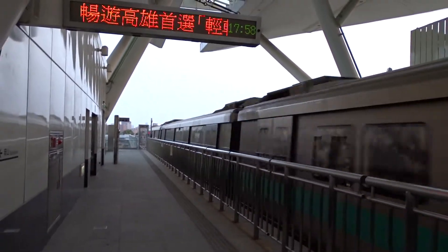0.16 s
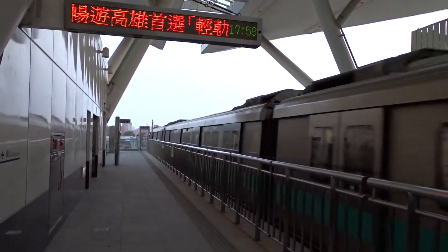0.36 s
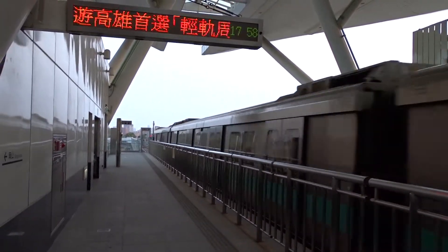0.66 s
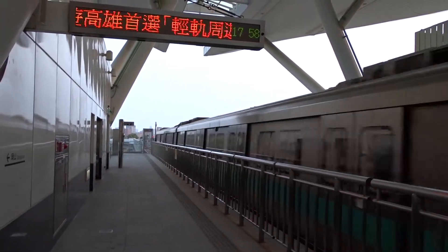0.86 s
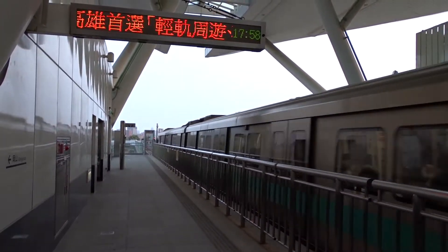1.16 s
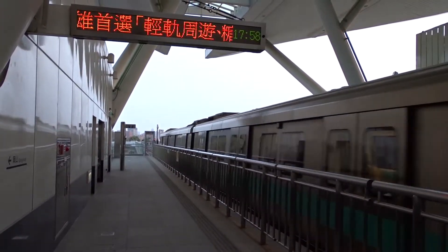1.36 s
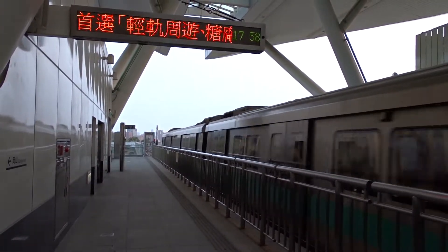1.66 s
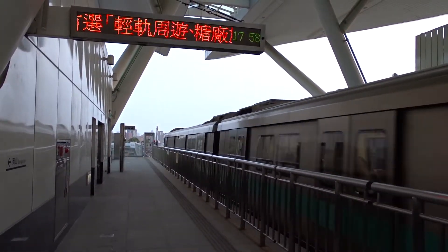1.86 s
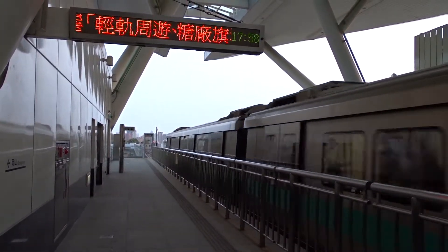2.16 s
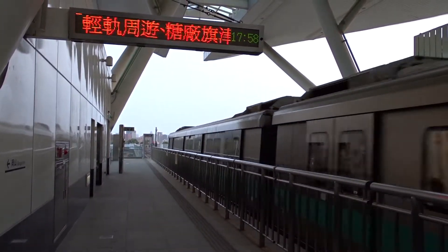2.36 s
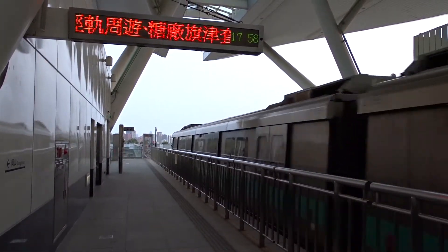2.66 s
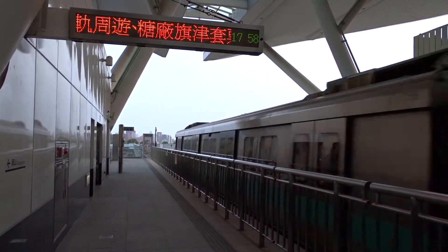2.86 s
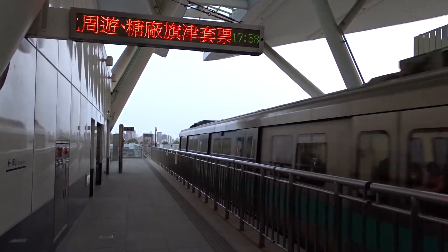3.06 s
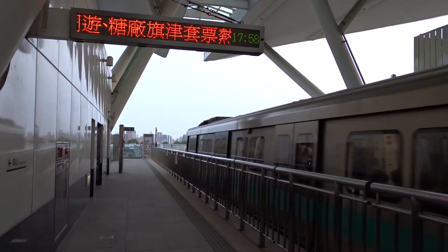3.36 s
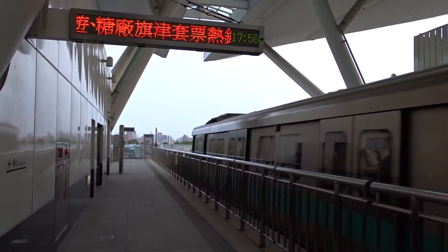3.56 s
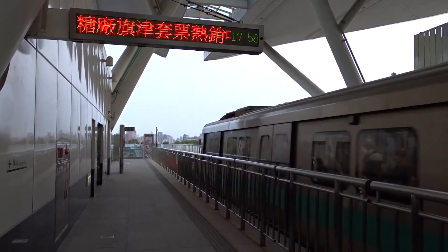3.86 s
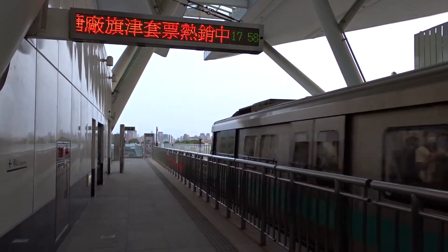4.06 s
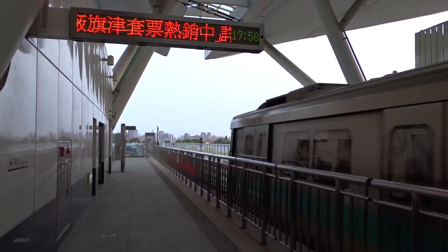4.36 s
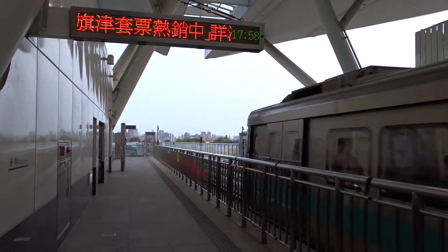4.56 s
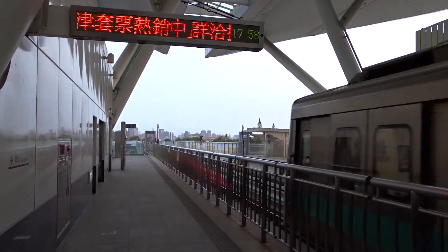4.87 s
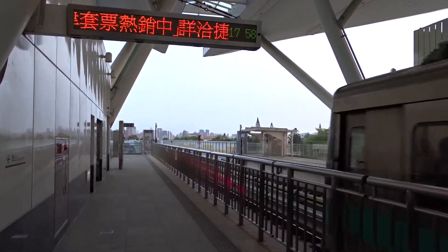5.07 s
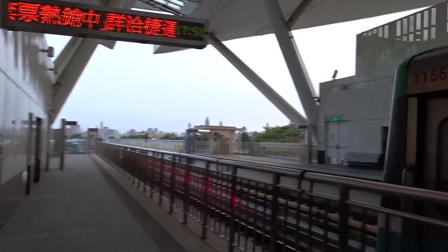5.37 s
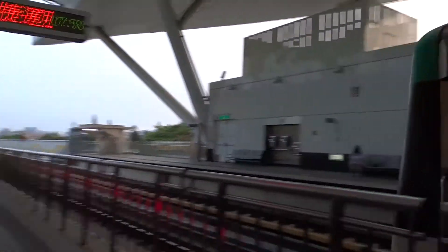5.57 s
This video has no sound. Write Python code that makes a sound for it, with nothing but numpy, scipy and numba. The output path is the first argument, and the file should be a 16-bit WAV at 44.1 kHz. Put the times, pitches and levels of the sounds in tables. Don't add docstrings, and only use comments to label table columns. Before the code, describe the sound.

Close stereo pickup beside a railing as train cars pass. Continuous wheel roar and rumble swell with each bogie; rough electric whine strengthens while the gear tone slides slowly down. Short hollow groans and blurred wheel ringing come and go from about one second, with broad brake hiss throughout. Low throbbing hum underneath, scattered by hard platform surfaces; the wheels close by ease later, but the motors stay strong.

```python
import sys
import numpy as np
from scipy import signal
from scipy.fft import rfft, irfft, next_fast_len
from scipy.io import wavfile
from scipy.ndimage import uniform_filter1d, map_coordinates
from numba import njit

SR = 44100
rng = np.random.default_rng(int(sys.argv[2]) if len(sys.argv) > 2 else 0)


def voltage_ratio(level):
    return 10 ** (np.asarray(level, float) / 20)


def materialize(psi):
    bounded = np.clip(np.atleast_2d(psi).T, -1, 1)
    quanta = np.round(bounded * 32767).astype(np.int16)
    wavfile.write(sys.argv[1], SR, quanta)


N = 252252
TIME = np.arange(N) / SR
MESH_HZ, STOP_S = 875, 13.9

# order, level_db, side_line_share (0-1), side_line_spacing_motor_cycles
SWITCHING_OVERTONES = [(1, -19.5, 0.75, 3.3), (2, 1, 0.06, 3), (3, -5, 0.94, 2.6), (4, -11, 0.05, 3),
                       (5, -19.5, 0.97, 2.6), (6, -15.5, 0, 2.7), (7, -22.5, .7, 2.6), (8, -16.5, 0, 3),
                       (9, -23.5, 1, 1.8), (10, -20, 0.04, 3), (11, -27, 0.6, 1.5)]
# doppler_share, level_db
BOGIES = [(.8, -2.17), (-.6, -3.5), (1.6, -6.5), (-.2, -3.5)]
# time_s, tilt_db_per_octave, unsteadiness_factor, doppler_percent
SONG_SETTLING = [(0, -0.5, 1.35, 1.24), (.9, -2, 1.33, 1.49), (2, -1.5, 1.226, 1.7),
                 (3.2, -1.3, 1.184, 1.275), (4.3, -1, 1.05, .6), (5.72, -1.4, 0.89, 0.098)]
# time_s, level_db
MOTOR_EFFORT = [(0, -32.5), (.3, -30), (.45, -27.5), (.65, -30.5), (.95, -24.5), (1.6, -24), (2.05, -24.5),
                (2.28, -23), (2.45, -25), (2.8, -22.5), (3.5, -23), (4.3, -22.5), (5.0, -22), (5.3, -20.5),
                (5.72, -20.5)]
# time_s, level_db
AXLE_NEARNESS = [(0, -36), (.6, -37.5), (.9, -33.5), (1.2, -35.5), (1.5, -42), (2.5, -28), (3.4, -27),
                 (4.0, -22), (4.5, -27.5), (4.9, -25.5), (5.3, -31.5), (5.72, -37)]
# centre_hz, width_hz, level_db
GEARBOX_MODES = [(867, 37, -1), (803, 67, 2), (790, 51, -17), (706, 35, -12), (624, 19, -14), (587, 22, -7),
                 (527.1, 50, -3.5)]
# time_s, level_db
WHEEL_LOAD = [(0, -27.5), (.65, -29), (.95, -27), (1.2, -24), (1.7, -25), (2.1, -25), (2.75, -25.5),
              (3.12, -27), (3.65, -24.5), (3.85, -24.5), (4.03, -23.5), (4.22, -27), (4.8, -28.5),
              (5.3, -29.5), (5.72, -27)]
# freq_hz, level_db_per_hz
RUMBLE_SPECTRUM = [(12, -47), (20, -23), (49, -3.5), (86, -8.5), (140, -1.5), (168, -3), (183, -4.5),
                   (200, -10.5), (260, -38), (440, -120)]
# freq_hz, level_db_per_hz
ROAR_SPECTRUM = [(120, -40), (200, -6.5), (300, -5), (450, -8.5), (560, -7), (800, -14), (1100, -31)]
# freq_hz, level_db_per_hz
UPPER_SPECTRUM = [(500, -33), (750, -3), (900, -1), (1000, -5), (1200, -2.5), (1600, -7.5), (2400, -14),
                  (3500, -27.5)]
# centre_hz, width_hz, level_db
TRACK_MODES = [(268, 60, -2.5), (343, 63, -0.5), (417, 20, 0), (436, 105, -8.5), (503, 5.4, -21)]
# centre_hz, width_hz, level_db
WHEEL_MODES = [(674, 51, 5.5), (610, 33, -4.5), (748, 97, -7.5), (1150, 80, -16.5)]
# start_s, length_s, level_db
WHEEL_RINGS = [(0, 0.33, -35), (1.092, 0.66, -29.5), (1.604, 0.68, -27.5), (2.097, 0.59, -25.5),
               (2.849, 0.66, -31.5), (3.304, 0.59, -27), (3.8, 0.52, -25), (4.206, 0.45, -28.5)]
# time_s, level_db
PAD_PRESSURE = [(0, -42), (.55, -42.5), (1.05, -36), (1.35, -36.5), (2.0, -39.5), (2.4, -37.5), (3.2, -38),
                (3.5, -37.5), (4.4, -39.5), (5.05, -37.5), (5.72, -40)]
# freq_hz, level_db_per_hz
HISS_SPECTRUM = [(1500, -2), (2300, 0.5), (3500, 2.5), (4100, 1.5), (4600, -9), (5500, -20), (7000, -29),
                 (9000, -20)]
# freq_hz, level_db_per_hz
FIZZ_SPECTRUM = [(4000, -3), (5500, -2), (7000, -1), (8300, -1), (9500, -6.5), (10400, -14.5),
                 (11000, -11.5)]
# start_s, length_s, start_hz, end_hz, level_db
BOGIE_GROANS = [(0.95, 0.52, 349.5, 430, -26.5), (1.1, 0.43, 690, 676, -39), (1.301, 0.36, 345, 340, -28),
                (2.1, 0.41, 425, 441, -29.5), (2.394, 0.74, 268, 257, -28), (2.499, 0.48, 345, 323.1, -31),
                (3.198, 0.79, 350, 390.7, -33), (0, 0.69, 400, 357, -37), (.85, .5, 806, 690, -33),
                (4.2, 1.07, 524.6, 516.6, -37)]
# start_s, length_s, pitch_hz, level_db
UNIT_THROBS = [(0.116, 0.28, 178, -30.5), (0.597, 0.46, 177.7, -32), (1.079, 0.19, 173, -24.5),
               (1.252, .17, 175.3, -23.5), (1.521, 0.29, 173, -25), (1.887, 0.18, 170.5, -25.5),
               (2.22, .2, 173.2, -29), (2.66, 0.21, 173, -27.5), (2.9, .22, 174.7, -28.5),
               (3.26, .32, 175.7, -23), (3.598, 0.369, 172.4, -28.5), (4.171, .22, 176.5, -29.5),
               (4.45, 0.44, 173, -33), (5.05, 0.19, 173, -29.5), (5.32, .4, 174, -32)]
# freq_hz, level_db (against direct)
PLATFORM_SCATTER = [(60, -8), (150, -11), (300, -12), (800, -9), (1500, -4.5), (5000, -3.5), (8500, -2),
                    (10500, 1)]
# freq_hz, left_lead_rad
PORT_PHASE = [(30, -.15), (90, -.33), (300, -.78), (550, -1.05), (1100, -1.05), (2000, -.84), (3100, -.63),
              (5000, -.38), (8500, -.25), (10300, -.6)]
# freq_hz, left_minus_right_db
PORT_LEAN = [(60, 0.0), (110, 0.5), (190, 0.0), (330, 0.5), (590, 0.0), (1050, 0), (1860, -0.5),
             (3300, 0.0), (5850, 0.0), (10400, -1)]


def motors(switch_hz, wander_hz, jitter_hz, teeth):
    song_db, = curves(MOTOR_EFFORT)
    tilt_db, unsteady, doppler_percent = curves(SONG_SETTLING)
    cycle_hz = MESH_HZ * speed() / teeth
    song = np.zeros(N)
    for doppler_share, near_db in BOGIES:
        wander = unsteady * (wander_hz * wobble(70) + jitter_hz * wobble(500))
        carrier = turns(switch_hz * (1 + doppler_share * doppler_percent / 100) + wander)
        cycle = turns(cycle_hz + 22 * wobble(90))
        near = voltage_ratio(near_db + 0.45 * wobble(2.84))
        for order, level_db, share, spacing in SWITCHING_OVERTONES:
            beat = order * carrier + order * order
            centre = np.sqrt(1 - share) * np.cos(beat)
            sides = np.sqrt(2 * share) * np.cos(spacing * cycle) * np.sin(beat)
            song += near * voltage_ratio(level_db + tilt_db * np.log2(order / 2)) * (centre + sides)
    return voltage_ratio(song_db + 1.3) * song


def gears(spread_hz, count):
    whine_db, = curves(AXLE_NEARNESS)
    whine = np.zeros(N)
    for _ in range(count):
        mesh = turns(MESH_HZ * speed() + spread_hz * wobble(40))
        whine += voltage_ratio(0.81 * wobble(6.3)) * np.cos(mesh)
    return voltage_ratio(whine_db) * ringing(whine, GEARBOX_MODES)


def rolling():
    rumble_db, rumble_follows = -5.5, 0.48
    upper_follows, upper_arrives_s = 0.65, 0.92
    ring_idle_db, ring_rise_s, ring_fall_s = -37, 0.13, 0.2
    load_db, = curves(WHEEL_LOAD)
    mean_db = load_db.mean()
    swing_db = load_db - mean_db

    rumble_db = rumble_db + rumble_follows * swing_db + 0.89 * wobble(5.76)
    rumble = voltage_ratio(rumble_db) * coloured(patchy(1.0), RUMBLE_SPECTRUM)
    roar = voltage_ratio(2.0) * coloured(patchy(0.58), ROAR_SPECTRUM)
    roar = roar + voltage_ratio(-3.5) * ringing(patchy(0.27), TRACK_MODES)
    upper_db = upper_follows * swing_db - 4.1 * np.exp(-TIME / upper_arrives_s)
    upper = voltage_ratio(upper_db) * coloured(patchy(0.26), UPPER_SPECTRUM)

    passing = voltage_ratio(ring_idle_db)
    for start_s, length_s, level_db in WHEEL_RINGS:
        passing = passing + voltage_ratio(level_db) * swell(start_s, length_s, ring_rise_s, ring_fall_s)
    ring = passing * voltage_ratio(1.7 * wobble(12)) * ringing(patchy(0.87), WHEEL_MODES)
    return voltage_ratio(mean_db) * (rumble + voltage_ratio(swing_db) * roar + upper) + ring


def brakes():
    hiss_db_per_halving = 8
    fizz_db, fizz_follows, fizz_warms_s = 2.5, 0.99, 0.52
    pressure_db, = curves(PAD_PRESSURE)
    mean_db = pressure_db.mean()
    burst_db = 0.6 * grips(per_s=78, build_s=0.012) + 0.19 * wobble(45) + 2.3 * wobble(150)

    hiss_db = pressure_db + hiss_db_per_halving * np.log2(speed()) + 9
    hiss = voltage_ratio(hiss_db) * coloured(voltage_ratio(burst_db) * patchy(0.3), HISS_SPECTRUM)
    fizz_db = fizz_db + mean_db + fizz_follows * (pressure_db - mean_db)
    fizz_db = fizz_db - 3.4 * np.exp(-TIME / fizz_warms_s)
    fizz = voltage_ratio(fizz_db) * coloured(voltage_ratio(0.89 * burst_db) * patchy(0.51), FIZZ_SPECTRUM)
    return hiss + fizz


def grips(per_s, build_s):
    slips = (rng.random(N) < per_s / SR) * rng.exponential(size=N)
    keep = np.exp(-1 / (build_s * SR + 1))
    grip = signal.lfilter([1], [1, -keep], slips[::-1])[::-1]
    return unit(grip - grip.mean())


def groans(rough_hz):
    tones = np.zeros(N)
    for start_s, length_s, start_hz, end_hz, level_db in BOGIE_GROANS:
        progress = np.clip((TIME - start_s) / length_s, 0, 1)
        pitch_hz = start_hz + (end_hz - start_hz) * progress + rough_hz * wobble(30)
        level = voltage_ratio(level_db + 3 + 2.6 * wobble(18)) * np.sin(np.pi * progress)
        tones += level * np.cos(turns(pitch_hz))
    return tones


def hum():
    edge_s = 0.047
    drift = turns(1.81 * wobble(22))
    flutter = voltage_ratio(1.5 + 1.6 * wobble(14))
    tones = np.zeros(N)
    for start_s, length_s, pitch_hz, level_db in UNIT_THROBS:
        level = voltage_ratio(level_db) * swell(start_s, length_s, edge_s, edge_s)
        tones += level * np.cos(2 * np.pi * pitch_hz * TIME + drift)
    return flutter * tones


def platform(x):
    hz, _, z = signal.stft(x, SR, nperseg=2048)
    shape = (2,) + z.shape
    real = uniform_filter1d(rng.standard_normal(shape), size=4, axis=2)
    imag = uniform_filter1d(rng.standard_normal(shape), size=4, axis=2)
    paths = unit(real + 1j * imag)
    wet = voltage_ratio(along(PLATFORM_SCATTER, hz))[:, None]
    mixed = z * (1 + wet * paths) / np.sqrt(1 + wet ** 2)
    return signal.istft(mixed, SR, nperseg=2048)[1][:, :N]


def speed():
    return 1 - TIME / STOP_S


def swell(start_s, length_s, rise_s, fall_s):
    up = (TIME - start_s) / (rise_s + 1e-3)
    down = (start_s + length_s - TIME) / (fall_s + 1e-3)
    return np.sin(np.pi / 2 * np.clip(np.minimum(up, down), 0, 1)) ** 2


def turns(hz):
    return 2 * np.pi * (np.cumsum(hz) / SR + rng.random())


def wobble(knots_per_s):
    return map_coordinates(rng.standard_normal(12000), [TIME * knots_per_s])


def curves(rows):
    time_s, *columns = np.transpose(rows)
    return [np.interp(TIME, time_s, column) for column in columns]


def along(points, hz):
    f, v = np.transpose(points)
    return np.interp(np.log(hz + 1), np.log(f + 1), v)


def unit(x):
    return x / np.sqrt(np.mean(np.abs(x) ** 2) + 1e-20)


def patchy(depth_db):
    z = signal.stft(rng.standard_normal(N), nperseg=512)[2]
    field = uniform_filter1d(rng.standard_normal(z.shape), size=5, axis=0)
    field = unit(uniform_filter1d(field, size=12, axis=1))
    return signal.istft(z * voltage_ratio(depth_db * field), nperseg=512)[1][:N]


def filtered(x, response):
    m = next_fast_len(N + 8192)
    return irfft(rfft(x, m) * response(np.fft.rfftfreq(m, 1 / SR)), m)[..., :N]


def coloured(x, spectrum):
    points = [(1, -90)] + spectrum + [(SR / 2, -120)]
    return unit(filtered(x, lambda hz: voltage_ratio(along(points, hz))))


def ringing(x, modes):
    def response(f):
        return sum(voltage_ratio(db) / (1 + ((f - hz) / width_hz * 2) ** 2) for hz, width_hz, db in modes)
    return unit(filtered(x, response))


@njit
def follow(size, rise, fall):
    out, held = np.empty_like(size), size[:2000].mean()
    for i in range(len(size)):
        held += (rise if size[i] > held else fall) * (size[i] - held)
        out[i] = held
    return out


def levelled(x, attack_s, release_s, knee_db, squeeze):
    held = follow(np.abs(x).max(axis=0), 1 / (attack_s * SR + 1), 1 / (release_s * SR + 1))
    return x * (voltage_ratio(knee_db) / np.maximum(held, 0.05)) ** squeeze


def scene():
    train = motors(switch_hz=1001.6, wander_hz=12, jitter_hz=14, teeth=17)
    train = train + gears(spread_hz=22.9, count=3)
    return platform(train + rolling() + brakes() + groans(rough_hz=8.01) + hum())


def top_cut(x):
    return signal.sosfilt(signal.butter(12, 11120, fs=SR, output="sos"), x)


def record(dry):
    ceiling, top_hz, skirt_db_per_hz = 0.85, 11005, 0.45
    half = np.array([[0.5], [-0.5]])

    def ports(hz):
        return np.exp(1j * half * along(PORT_PHASE, hz)) * voltage_ratio(half * along(PORT_LEAN, hz))

    def skirt(hz):
        return voltage_ratio(-np.clip(skirt_db_per_hz * (hz - top_hz), 0, 120))

    heard = filtered(dry, ports)
    heard = levelled(heard, attack_s=0.00056, release_s=0.01, knee_db=-11.5, squeeze=0.54)
    heard = heard / (1 + np.abs(heard / ceiling) ** 4) ** 0.25
    return top_cut(filtered(heard, skirt))


dry = scene()
out = record(dry)
materialize(out)
```